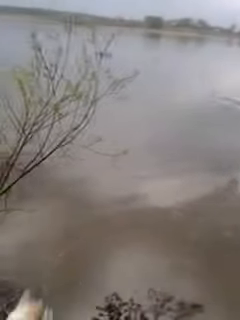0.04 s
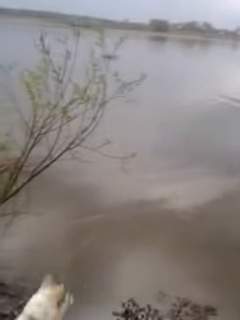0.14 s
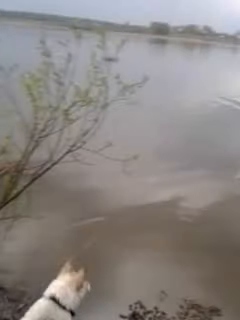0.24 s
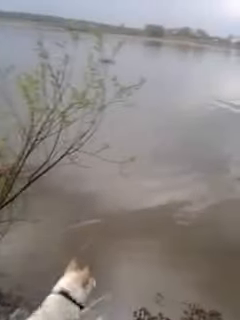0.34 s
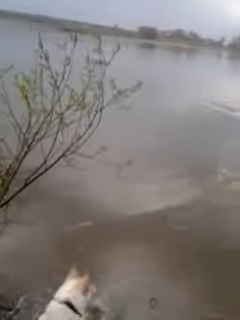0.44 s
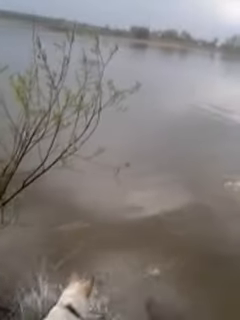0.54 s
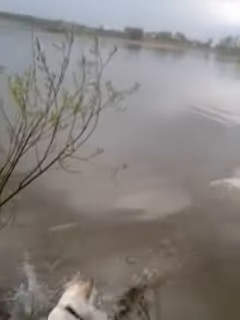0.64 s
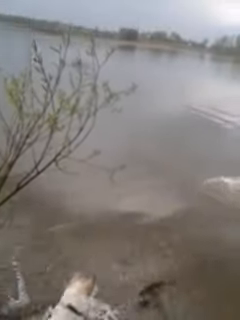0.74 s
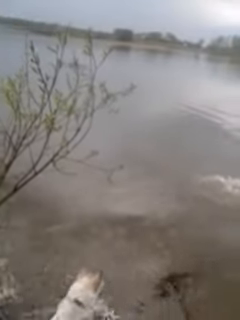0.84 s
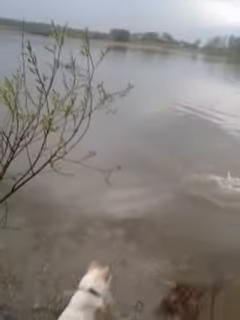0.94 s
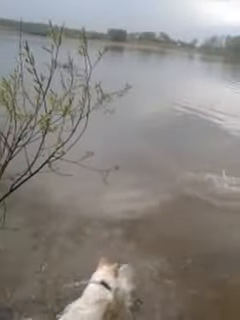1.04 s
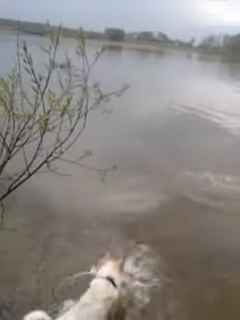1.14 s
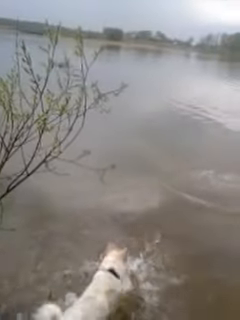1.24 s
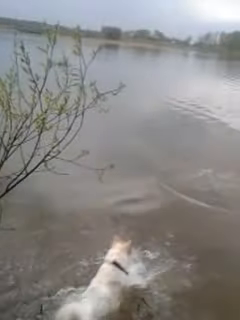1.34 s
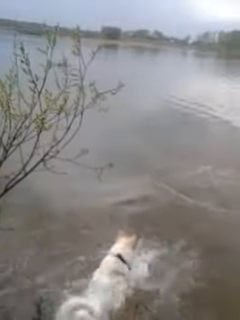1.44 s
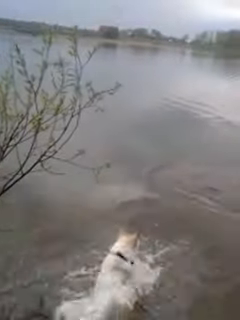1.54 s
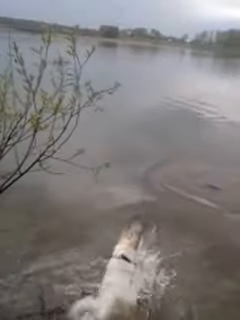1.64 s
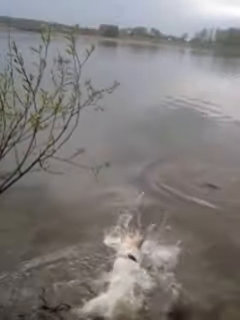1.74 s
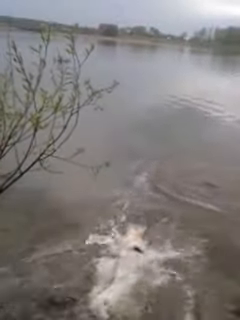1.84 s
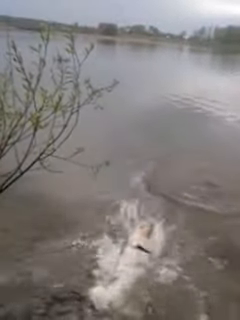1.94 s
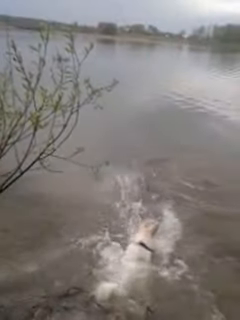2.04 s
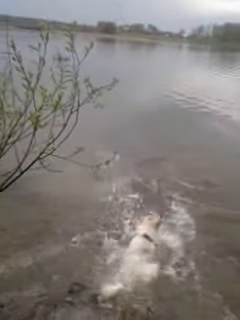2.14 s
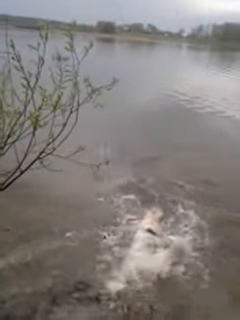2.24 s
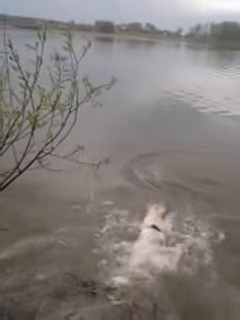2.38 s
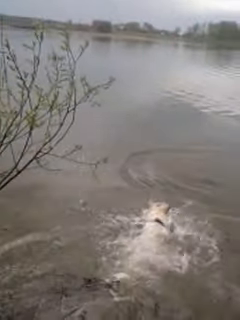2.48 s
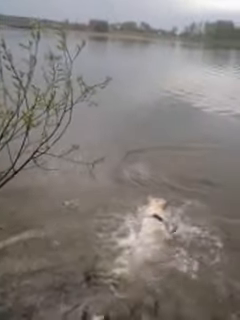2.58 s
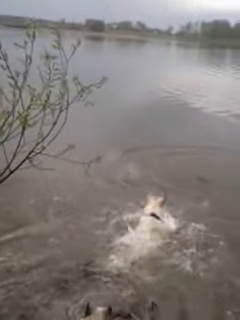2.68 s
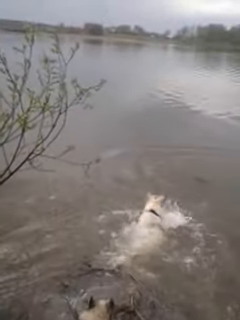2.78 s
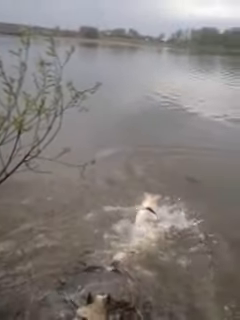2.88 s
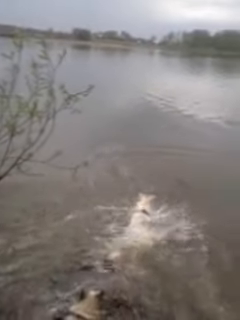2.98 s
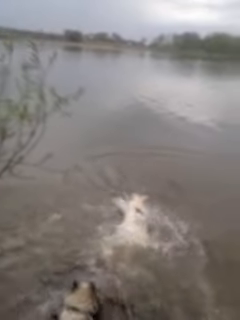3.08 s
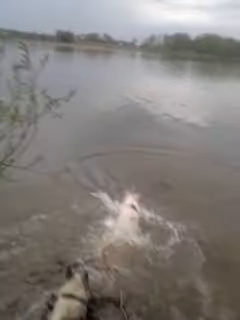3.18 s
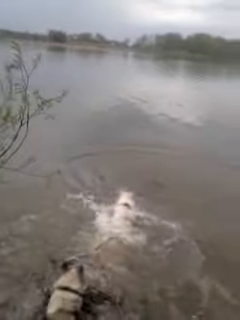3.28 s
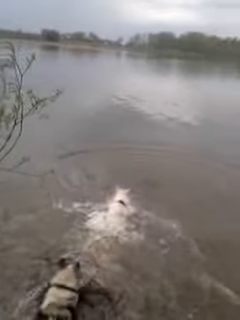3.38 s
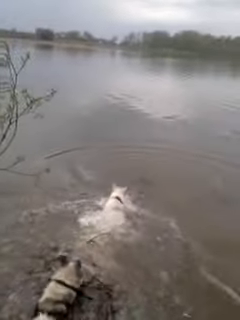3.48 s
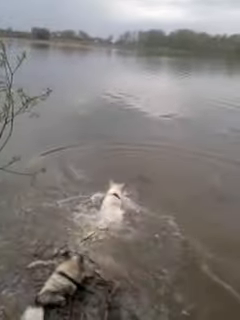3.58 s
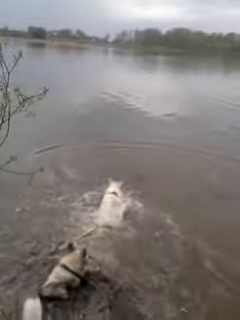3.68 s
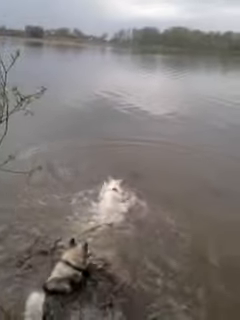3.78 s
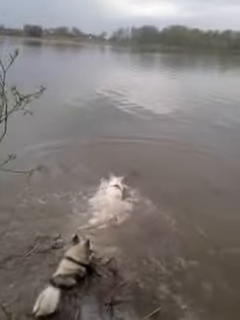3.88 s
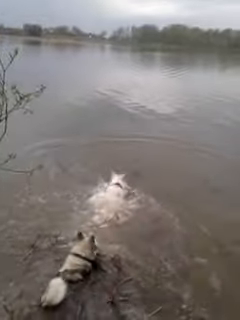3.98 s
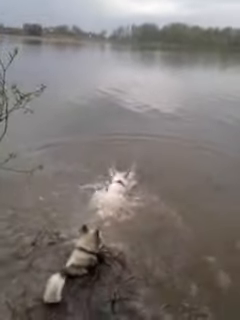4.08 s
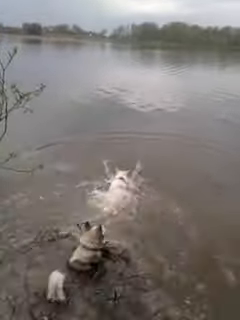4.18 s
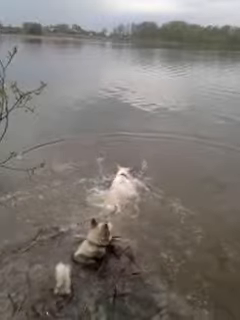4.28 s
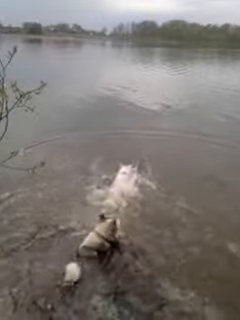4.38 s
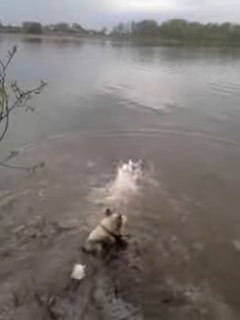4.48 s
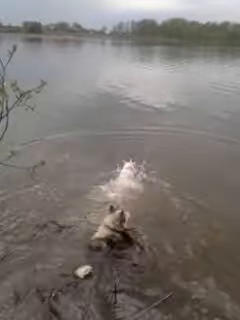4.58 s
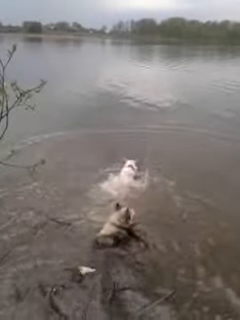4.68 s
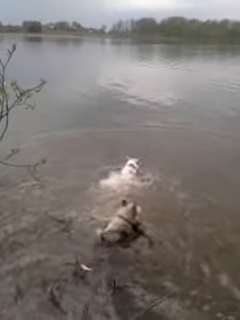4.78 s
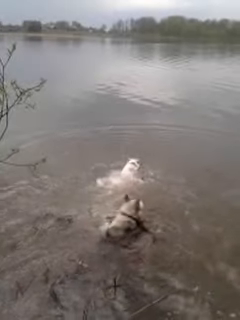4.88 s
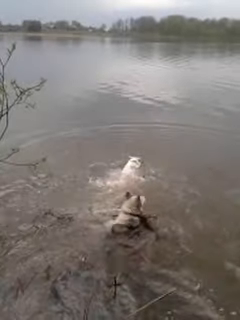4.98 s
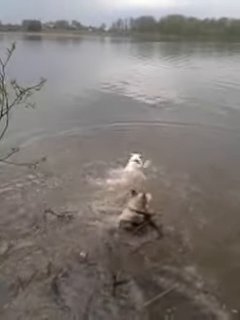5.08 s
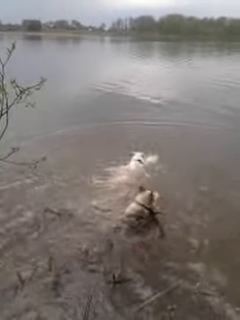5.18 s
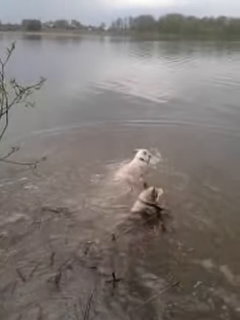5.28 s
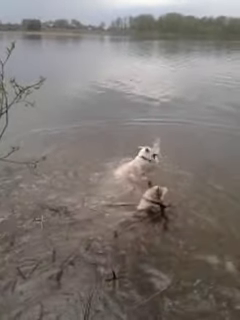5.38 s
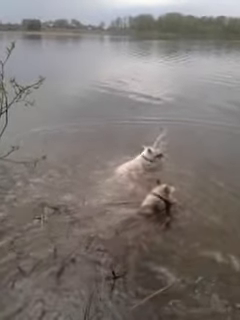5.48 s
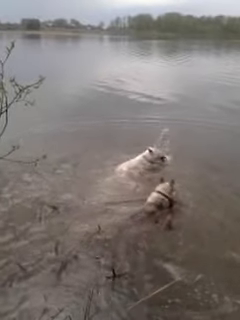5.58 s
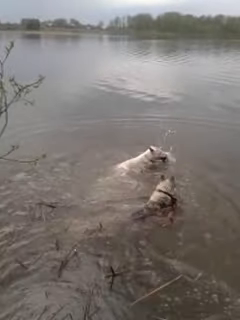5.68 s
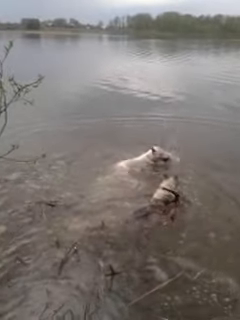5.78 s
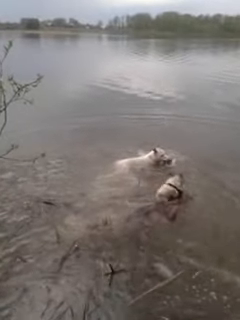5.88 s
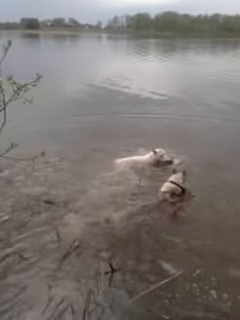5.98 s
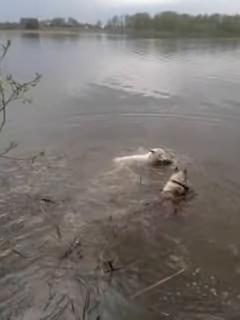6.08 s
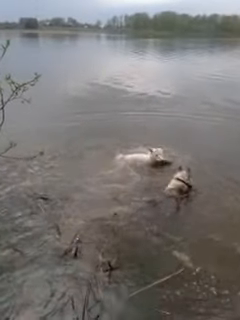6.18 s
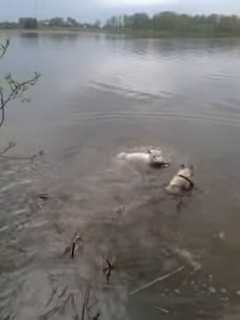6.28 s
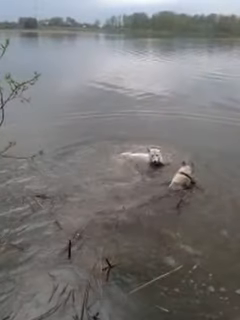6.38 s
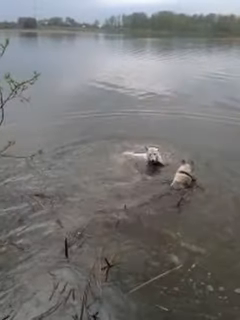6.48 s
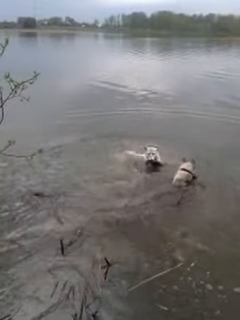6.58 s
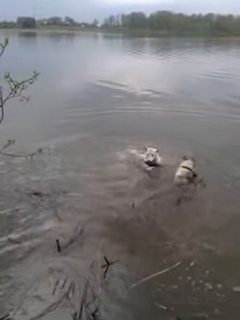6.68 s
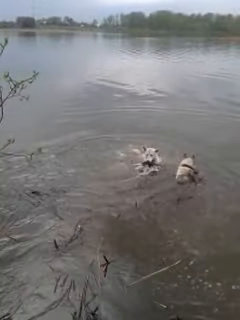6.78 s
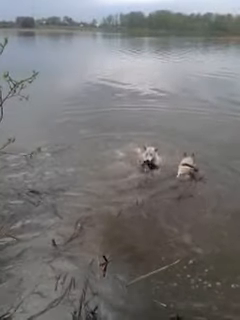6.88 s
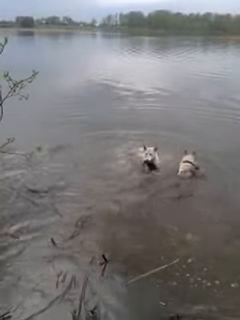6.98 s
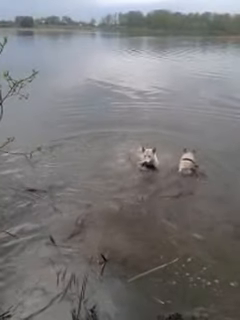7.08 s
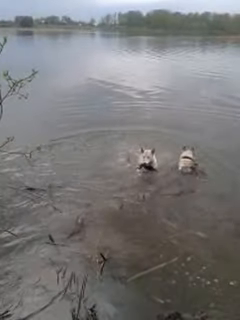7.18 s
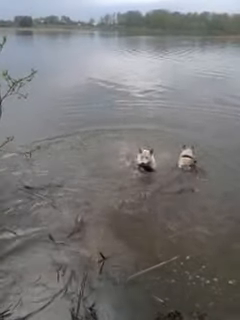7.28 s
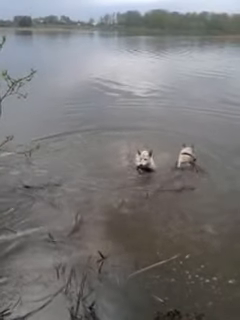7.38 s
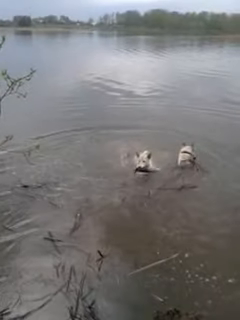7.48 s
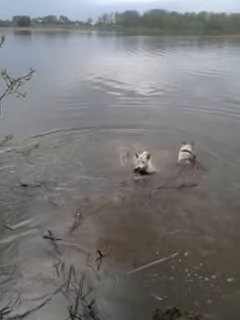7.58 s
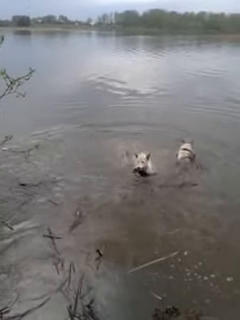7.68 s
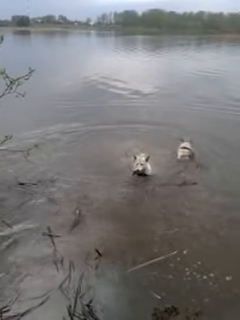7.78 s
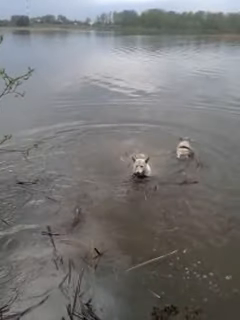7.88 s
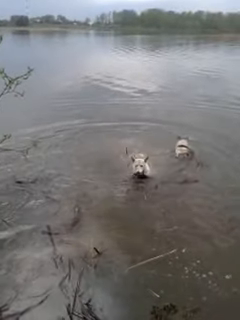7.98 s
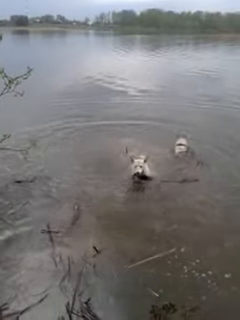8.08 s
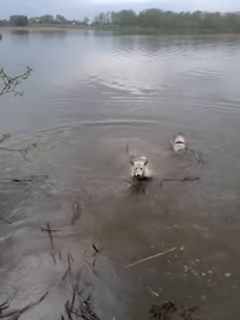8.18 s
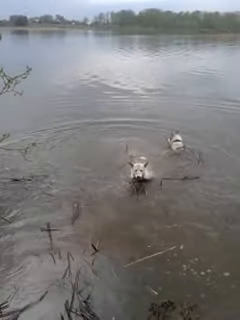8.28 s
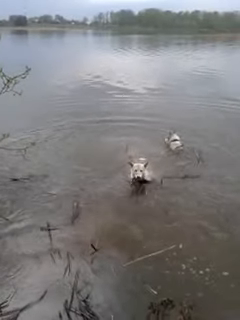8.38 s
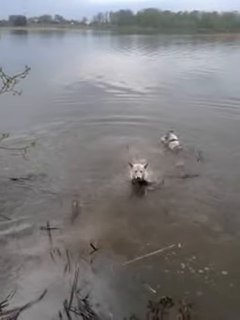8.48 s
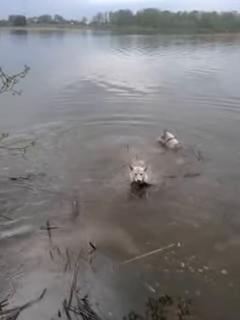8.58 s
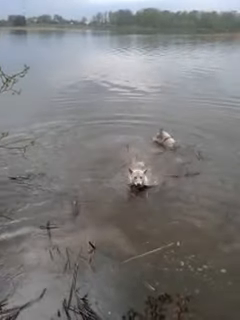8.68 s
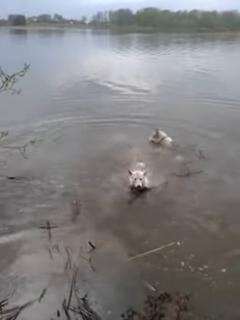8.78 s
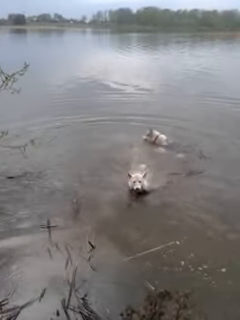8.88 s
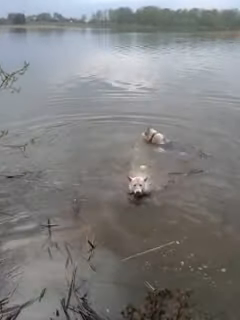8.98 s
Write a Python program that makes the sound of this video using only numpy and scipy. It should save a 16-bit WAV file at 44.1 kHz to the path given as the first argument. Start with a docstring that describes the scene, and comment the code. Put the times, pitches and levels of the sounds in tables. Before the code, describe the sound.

Heavy, crackling splashes burst out as two dogs plunge into shallow water, thinning to gentle gurgles, plops and droplets over a quiet outdoor hush.

```python
"""Paws of two dogs slap a shallow lake as they bound in and paddle away from a small mono microphone on the bank.
Slaps are short dying sines with a click and a burst of noise; air dragged under plops and gulps as rising sines.
Clouds of random ringing bubbles make the stirred water gurgle, drops patter back and fine spray fizz.
Filtered noise makes the plunges thud over a soft outdoor hush and a low rumble.
A narrow-band recorder hard-clips whatever exceeds full scale."""
import sys
import numpy as np
from scipy import signal
from scipy.fft import rfft, irfft
from scipy.io import wavfile

SR = 44100
rng = np.random.default_rng(int(sys.argv[2]) if len(sys.argv) > 2 else 0)


def unload_wav(signal):
    """Save mono or channel-first audio to the path in sys.argv[1] as 16-bit WAV at rate SR, clipped to [-1, 1]."""
    wavfile.write(
        sys.argv[1],
        SR,
        np.round(np.clip(np.atleast_2d(signal).T, -1, 1) * 32767).astype(np.int16),
    )


N = 398663

# Paws and sheets of water hitting the surface. Each row: start in seconds, ring peak in dB, pitch in Hz,
# spray burst in dB relative to that peak.
SLAPS = [(0.024, -26, 4840, -17), (.0568, -26, 2220, 2), (.1191, -22, 2100, -14), (.172, -23, 5700, -3),
         (.1885, -19.5, 2160, -3.5), (.2144, -14, 2160, -5), (.2882, -18.5, 2170, -14),
         (0.3221, -18.5, 4580, -7), (.385, -13, 2260, 2), (0.4482, -8.5, 4320, -18), (.5686, -18, 1770, -5),
         (0.5873, -10.5, 1920, -7), (0.6273, -6.5, 4080, -6), (.6963, -20, 2110, -9),
         (0.7169, -4, 4250, -1.5), (0.7616, -3.5, 5220, -13), (0.8776, -8.5, 5000, -5.5),
         (1.0934, -12.5, 4480, -1), (1.1256, -2, 2107, -12.5), (1.1745, -13, 4330, -23),
         (1.272, -8, 2110, -12), (1.3002, -12, 4420, 3.5), (1.3432, -20, 4430, 3), (1.4889, -19, 2030, 0),
         (1.6487, -17.5, 2100, -18), (1.7085, -25, 5570, -7), (1.7414, -16.5, 2210, -19),
         (1.79, -32, 2220, -9), (1.8844, -23, 5500, -16), (1.934, -14.5, 2130, -9), (2.013, -19, 5300, -13),
         (2.1021, -22, 2200, -16), (2.2209, -20, 1560, -1.5), (2.3909, -21, 2160, -9),
         (2.5952, -25, 1490, -15), (2.6334, -19, 2350, -14), (2.6997, -14, 2080, -7.5),
         (2.8095, -23, 2200, 6.5), (2.9312, -21.5, 2140, 1), (2.9886, -21.5, 2280, -5),
         (3.037, -24.5, 2110, -7), (3.3638, -19, 2050, -7), (3.5074, -22, 2070, -4.5),
         (3.6772, -24.5, 1870, -7), (3.713, -22.5, 1540, -13), (4.0292, -30, 2240, -4),
         (4.199, -29, 1960, -7), (4.2152, -28, 2220, 1), (4.4186, -33, 2140, -7), (4.6979, -25, 1320, -9),
         (4.8968, -27.5, 1980, -6), (5.3782, -29, 1750, -8), (5.3952, -26, 2270, -19),
         (5.4136, -24.5, 1910, -29), (5.565, -17, 1820, -22), (5.5887, -27, 1970, -14),
         (5.7911, -27, 1730, -28), (5.8122, -22, 1770, -20), (6.0933, -22, 2110, -31),
         (6.161, -14, 1670, -33), (6.183, -20, 2030, -25), (6.348, -26, 5870, -6),
         (6.5784, -28.5, 1770, -34), (7.1037, -16.5, 1720, -34), (7.539, -33, 2070, -18),
         (8.4331, -28.5, 2060, -20), (8.4492, -27.5, 1540, -21), (8.5101, -26, 2050, -21),
         (8.5382, -25, 1680, -26), (8.5854, -31, 2060, -25), (8.9655, -38.5, 1910, -7)]
# A leg or chest plunging in. Each row: start in seconds, gulp peak in dB, pitch in Hz, ring t60 in seconds,
# thud in dB, wash of drops falling back in dB.
PLUNGES = [(0.188, -38, 374, 0.069, -60, -27.5), (0.312, -30, 238, 0.084, -62, -30),
           (0.371, -21, 352, 0.094, -62, -26), (.576, -24, 304, 0.047, -54, -27),
           (0.698, -40, 270, 0.1, -57, -32), (0.787, -32, 339, 0.17, -48, -35),
           (0.879, -38, 328, 0.14, -48.5, -28), (1.1, -48, 302, 0.075, -54, -25.5),
           (1.156, -31.5, 308, 0.088, -64, -44), (1.266, -25, 327, 0.077, -59, -27.5),
           (1.48, -20.5, 338, 0.059, -47.5, -25.5), (1.736, -42, 296, 0.26, -59, -32),
           (1.793, -31, 328, 0.12, -40.5, -48), (2.02, -38, 340, .12, -51, -49),
           (2.113, -27, 310, 0.087, -42, -35), (2.252, -49, 300, 0.075, -56, -43),
           (2.519, -24.5, 370, 0.059, -46, -41), (2.721, -29.5, 376, 0.066, -55, -36),
           (2.874, -24.5, 323, 0.073, -47, -32), (3.069, -38.5, 294, 0.33, -62, -45),
           (3.221, -22.5, 345, 0.042, -47, -28.5), (3.543, -28, 340, 0.049, -48, -47),
           (3.773, -36.5, 340, .17, -58, -36.5), (3.873, -34, 413, 0.066, -56, -41),
           (4.09, -32.5, 253, 0.14, -66, -34), (4.203, -37, 397, 0.093, -53, -34),
           (4.461, -44, 212, 0.12, -66, -56), (4.544, -40.5, 400, 0.087, -58, -33.5),
           (4.794, -42, 247, 0.12, -62, -46), (4.883, -42, 406, 0.14, -52, -46.5),
           (5.053, -36, 352, 0.13, -64, -56), (5.379, -39, 240, 0.14, -61, -36.5),
           (5.561, -32.5, 427, 0.094, -56, -44), (5.804, -55, 350, 0.069, -61, -38),
           (6.141, -45, 350, 0.12, -58, -33), (6.34, -54, 350, 0.11, -54, -47),
           (7.014, -42, 297, 0.091, -61, -43), (7.329, -37, 384, .11, -62, -51),
           (7.733, -38, 296, 0.062, -55, -35.5), (8.497, -40, 407, 0.1, -60, -36.5)]
# Spectrum of big bubbles. Each row: frequency in Hz, relative density in dB per Hz.
GURGLE_SPECTRUM = [(65, -70), (110, -41.5), (231, -11), (327, -5), (445, -2.5), (623, 5.5), (785, 2),
                   (1100, -5), (1430, -30), (2420, -120)]
# Spectrum of fine spray. Each row: frequency in Hz, relative density in dB per Hz.
SPRAY_SPECTRUM = [(1620, -30), (2750, -20), (2860, -11.5), (3180, -4.5), (3550, -0.5), (4330, 0),
                  (5140, -2), (5510, -0.5), (5820, -5), (6920, 3.5), (7200, 4.5), (7710, -3.5),
                  (10000, -66), (17000, -120)]
# Colour of the water sound over time. Each row: time in seconds, share of the near colour from 0 to 1.
NEARNESS = [(0, 0.77), (3.3, 0.61), (4.2, 0.36), (9.04, 0.08)]
MOMENT = np.arange(SR // 2) / SR   # clock of one event in seconds; no event outlasts half a second


def from_db(db):
    """Level law: decibels to amplitude gain."""
    return 10 ** (np.asarray(db) / 20)


def rms_one(x):
    """Power normalization: scale to rms 1."""
    return x / np.sqrt(np.mean(x ** 2) + 1e-20)


def in_time(rows):
    """Linear interpolation: each column of a curve table becomes one value a sample."""
    s, *columns = np.transpose(rows)
    return [np.interp(np.arange(N) / SR, s, column) for column in columns]


def drift(rate):
    """Low-passed randomness: noise through two equal one-pole filters with corner rate in Hz, rms 1."""
    pole = np.exp(-2 * np.pi * rate / SR)
    noise = rng.standard_normal(N + SR)
    smooth = signal.lfilter([1], [1, -2 * pole, pole * pole], noise)
    return rms_one(smooth[SR:])   # the first second lets the filter settle


def colour(x, spectrum):
    """Minimum-phase filtering: a folded cepstrum gives a flat sound the spectrum causally; rms 1."""
    size = 2 ** 14
    hz, db = np.transpose(spectrum)
    log_bins = np.log(np.fft.rfftfreq(size, 1 / SR) + 1)
    log_gain = np.log(from_db(np.interp(log_bins, np.log(hz), np.maximum(db, -70))))
    cepstrum = irfft(log_gain)
    # fold negative time onto positive time
    cepstrum[1:size // 2] *= 2
    cepstrum[size // 2 + 1:] = 0
    impulse_response = irfft(np.exp(rfft(cepstrum)))
    return rms_one(signal.fftconvolve(x, impulse_response)[:N])


def noise(spectrum):
    """Spectral shaping: white noise coloured to a spectrum, rms 1."""
    return colour(rng.standard_normal(N), spectrum)


def fade(peak_db, t60, attack):
    """Exponential decay after a smooth swell whose time constant is a share (attack) of t60."""
    t = MOMENT[:round(2 * t60 * SR)]
    shape = (1 - np.exp(-t / (attack * t60))) ** 2 * from_db(-60 * t / t60)
    return from_db(peak_db) * shape / shape.max()


def add(track, s, sound):
    """Superposition: mix a short sound into a track at a time in seconds."""
    start = round(s * SR)
    track[start:start + len(sound)] += sound[:N - start]


def flares(events, attack):
    """Superposed decay envelopes of bursts given as (s, peak dB, t60 s)."""
    out = np.zeros(N)
    for s, peak_db, t60 in events:
        add(out, s, fade(peak_db, t60, attack))
    return out


def bubbles(low_hz, high_hz, per_s, cycles, uneven_db, clump_db, clump_rate, patchy_db, count=20):
    """Resonator bank: random clicks ring bubbles that lose 60 dB in a set number of cycles, in clumps."""
    strengths = from_db(uneven_db * np.minimum(rng.exponential(1, N), 4)) * rng.choice([-1, 1], N)
    born = rng.random(N) < per_s / SR
    dealt = rng.integers(0, count, N)   # which resonator each click rings
    # groups of five neighbouring sizes swell and thin on their own
    patches = [from_db(patchy_db * drift(clump_rate / 2)) for _ in range(count // 5)]
    out = 0
    for k, hz in enumerate(np.geomspace(low_hz, high_hz, count)):
        radius = from_db(-60 * hz / (cycles * SR))
        angle = 2 * np.pi * hz / SR
        clicks = strengths * born * (dealt == k) * patches[k // 5]
        poles = [1, -2 * radius * np.cos(angle), radius * radius]
        ringing = signal.lfilter([0, np.sin(angle)], poles, clicks + 1e-18)
        out = out + hz * ringing   # weight by pitch to level the spectrum
    return out * from_db(clump_db * drift(clump_rate))


def lone_bubbles(events, attack, rough, rough_rate, lead=.12):
    """Bubble resonance: a dying sine climbs near the surface, passing its pitch a share (lead) into its ring."""
    out = np.zeros(N)
    # turbulence shakes loudness and pitch
    shake, sway = drift(rough_rate), drift(rough_rate)
    for s, peak_db, hz, ring_s, octaves in events:
        shape = fade(peak_db, ring_s, attack)
        now = (round(s * SR) + np.arange(len(shape))) % N
        climb = octaves * (np.minimum(MOMENT[:len(shape)] / ring_s, 1) - lead)
        pitch = hz * 2 ** (climb + 0.18 * rough * sway[now])
        sine = np.sin(2 * np.pi * np.cumsum(pitch) / SR)
        add(out, s, shape * (1 + rough * shake[now]) * sine)
    return out


def pockets(events, octaves, attack, burst_attack, rough, rough_rate, lead=0):
    """Resonance with turbulence: one bubble an event, and the envelope of the burst of foam it throws up."""
    bursts = flares([(row[0] - lead, row[1] + row[4], row[5]) for row in events], burst_attack)
    ringing = lone_bubbles([(*row[:4], octaves) for row in events], attack, rough, rough_rate)
    return ringing, bursts


def companions(events, under_db, spread_octaves, late_s, count=3):
    """Bubble fragmentation: a big pocket breaks up, so fainter bubbles of other sizes follow each event."""
    chance = rng.random((len(events), count, 3))
    fragments = []
    for (s, peak_db, hz, ring_s, octaves), draws in zip(events, chance):
        for when, loud, size in draws:
            fragment_db = peak_db + under_db * (.5 + loud)
            fragment_hz = hz * 2 ** (spread_octaves * (size - .4))
            fragments.append((s + late_s * when, fragment_db, fragment_hz, ring_s * 0.83, octaves))
    return fragments


def patter(x):
    """Crossfaded spectra: the colour of drops falling back flattens as the dogs move off."""
    # Spectra near and far. Each row: frequency in Hz, relative density in dB per Hz.
    near_spectrum = [(530, -26.5), (900, 1), (1080, -4), (1860, -15.5), (2070, 0.5), (2180, 5), (2800, -20),
                     (3640, -58.5), (6160, -120)]
    far_spectrum = [(530, -41), (900, -7.5), (1240, 0.5), (1430, -2), (1680, -1.5), (2180, 0.5),
                    (2800, -35), (3640, -65.5), (6160, -120)]
    near = in_time(NEARNESS)[0]
    return near * colour(x, near_spectrum) + (1 - near) * colour(x, far_spectrum)


def plunge_envelope(column, t60, attack, lead=0):
    """Impulsive excitation: an envelope swells at every plunge to the level in one column of its row."""
    return flares([(row[0] - lead, row[column], t60) for row in PLUNGES], attack)


def hush():
    """Stationary noise: a steady soft outdoor hush."""
    # Spectrum of the hush. Each row: frequency in Hz, relative density in dB per Hz.
    hush_spectrum = [(19, -36.5), (32, -5), (71, -19), (113, -33), (183, -7.5), (390, -5), (551, 0.5),
                     (1260, 0), (1620, -10.5), (2080, -6.5), (2680, -16.5), (4150, -18), (6130, -28.5),
                     (7030, -27), (7710, -48), (10000, -81), (17000, -120)]
    return from_db(-46.5) * noise(hush_spectrum)


def rumble():
    """Stationary low-frequency noise: a steady rumble."""
    # Spectrum of the rumble. Each row: frequency in Hz, relative density in dB per Hz.
    rumble_spectrum = [(8.8, -25.5), (15, -0.5), (27, -18), (48, 2), (69, 1), (78, -6), (108, -35.5),
                       (140, -9), (180, -33), (310, -120)]
    return from_db(-63.5) * noise(rumble_spectrum)


def thuds():
    """Transient low-frequency noise: each plunge thuds and dies away."""
    # Spectrum of the thuds. Each row: frequency in Hz, relative density in dB per Hz.
    thud_spectrum = [(8.8, -26), (15, -3.5), (38, 4), (53, 5), (68, -5), (78, -22), (92, -35), (110, -32.5),
                     (140, -58.5), (240, -120)]
    return plunge_envelope(column=4, t60=0.37, attack=0.017) * noise(thud_spectrum)


def churn():
    """Bubble-cloud acoustics: three sizes follow the stirring, with falling drops and thrown sheets of spray."""
    # Stirred water between the plunges. Each row: time in seconds, gurgle, patter and spray levels in dB.
    stirring = [(0.0, -44.5, -39.5, -34.5), (0.2, -41, -35.5, -37.5), (0.38, -34.5, -37, -39),
                (0.73, -36.5, -25, -24.5), (0.93, -36.5, -30, -31), (1.66, -37, -31, -30.5),
                (2.49, -40, -34, -35), (2.79, -35, -31, -29.5), (3.04, -36.5, -35, -38.5),
                (3.47, -37.5, -30.5, -34.5), (4.18, -47.5, -41, -47), (4.91, -38.5, -36.5, -41),
                (5.24, -47, -39, -47.5), (6.12, -46, -42.5, -48.5), (6.65, -50.5, -48, -56),
                (7.3, -47.5, -39, -50.5), (7.53, -45, -44, -54.5), (8.43, -47, -47, -59.5),
                (8.61, -45.5, -43.5, -56), (9.04, -47, -48.5, -57.5)]
    # Sheets of spray fizzing as they fall. Each row: start in seconds, peak in dB, t60 in seconds.
    spray_sheets = [(.172, -22.5, 0.62), (.32, -25.5, 0.99), (.56, -30, .6), (.68, -35, 0.86),
                    (.78, -24, .5), (.89, -31, 1), (1.088, -20.5, 0.51), (1.25, -22.5, 0.41),
                    (1.48, -29.5, 0.58), (1.68, -31.5, .6), (1.97, -35.5, 1), (2.2, -32, 0.27),
                    (2.5, -36.5, 0.71), (2.69, -30.5, .7), (2.85, -35, .6), (2.95, -32, 0.16),
                    (3.23, -34, 1), (3.45, -39, 0.33), (3.67, -39.5, 0.55), (3.77, -38.5, 0.42),
                    (3.88, -44, 0.35), (4.03, -41.5, 1), (4.195, -34.5, 0.33), (4.4, -46, .4),
                    (4.55, -43, 0.49), (4.69, -44, 0.31), (4.82, -44.5, 1), (4.94, -44, 0.38),
                    (5.17, -49, 0.21), (5.36, -43.5, 1), (5.55, -40.5, .4), (5.8, -43.5, 0.43),
                    (6.03, -44, 0.47), (6.14, -43.5, .4), (6.2, -42.5, .5), (6.3, -47, 0.36),
                    (6.35, -49, 0.38), (6.41, -55, 0.23), (6.6, -51.5, 0.75), (6.88, -48.5, 0.75),
                    (7.02, -45.5, 0.53), (7.1, -46.5, 0.67), (7.27, -50, 1), (7.37, -44.5, 0.31),
                    (7.46, -53, 0.3), (7.64, -51.5, .5), (7.72, -48.5, 0.79), (7.8, -46.5, 0.23),
                    (7.95, -67, 0.26), (8.04, -48, 0.73), (8.11, -65, 0.45), (8.43, -48, 0.7),
                    (8.52, -55, .7), (8.72, -55, .7), (8.96, -59, 0.33)]
    gurgle_db, patter_db, spray_db = in_time(stirring)
    wash = plunge_envelope(column=5, t60=0.4, attack=0.04, lead=0.013)
    sheets = flares(spray_sheets, attack=0.015)
    big = bubbles(135.8, 1260, per_s=900, cycles=17.7, uneven_db=0.0,
                  clump_db=2.5, clump_rate=11.6, patchy_db=3.15)
    middle = bubbles(811, 3266, per_s=2400, cycles=18.6, uneven_db=0.0,
                     clump_db=2.15, clump_rate=12, patchy_db=1.5, count=30)
    fine = bubbles(2477, 8000, per_s=5000, cycles=80.0, uneven_db=-0.5,
                   clump_db=1.18, clump_rate=21.3, patchy_db=1.37, count=40)
    # independent sounds add in power, hence hypot
    gurgling = from_db(gurgle_db) * colour(big, GURGLE_SPECTRUM)
    pattering = np.hypot(from_db(patter_db), wash) * patter(middle)
    fizzing = np.hypot(from_db(spray_db), sheets) * colour(fine, SPRAY_SPECTRUM)
    return gurgling + pattering + fizzing


def trickle():
    """Sustained bubble resonance: a trickle holds its note."""
    # Notes of the trickle. Each row: start in seconds, peak in dB, pitch in Hz, ring t60 in seconds,
    # climb in octaves.
    trickle_notes = [(7.625, -38, 1810, 0.063, 0.32), (7.662, -32.5, 2070, 0.19, 0.026)]
    return lone_bubbles(trickle_notes, attack=0.047, rough=.3, rough_rate=190)


def droplets():
    """Small-bubble resonance: droplets standing out of the spray ring high; also their noise-tick envelope."""
    # Single droplets. Each row: start in seconds, peak in dB, pitch in Hz.
    single_drops = [(3.0435, -35, 5130), (3.142, -28, 4090), (3.1777, -31, 5400), (3.29, -40, 4850),
                    (3.6546, -34, 4140), (3.7843, -31, 5800), (4.0322, -36, 5560), (4.6633, -38, 3960),
                    (4.6983, -30, 3680), (4.838, -32.5, 3840), (4.9955, -36, 3670), (5.146, -32.5, 3800),
                    (5.233, -38, 3700), (5.459, -36, 3440), (5.51, -38, 3550), (5.8138, -29, 3800),
                    (6.048, -41, 5590), (6.094, -31, 4500), (6.218, -38, 4700), (6.6782, -42, 4280),
                    (7.1112, -38, 4030), (7.1591, -32.5, 3020), (7.653, -42, 4130), (7.8076, -35.5, 4030),
                    (7.9508, -40, 4070)]
    ring_s, climb_octaves = 0.018, 0.14
    rows = [(*row, ring_s, climb_octaves) for row in single_drops]
    ringing = lone_bubbles(rows, attack=.04, rough=0.36, rough_rate=1200)
    ticks = flares([(s, peak_db - 23, .012) for s, peak_db, _ in single_drops], attack=0.039)
    return ringing, ticks


def gulps():
    """Large-cavity resonance: plunges close deep pockets of air, which rise in pitch and break up."""
    climb_octaves_per_s = 13
    deep = [(*row[:4], climb_octaves_per_s * row[3]) for row in PLUNGES]
    broken_up = companions(deep, under_db=-10.5, spread_octaves=1.4, late_s=.04)
    return lone_bubbles(deep + broken_up, attack=0.026, rough=0.34, rough_rate=63)


def plops():
    """Bubble resonance: closing air pockets ring; also the envelope of foam building just before each closes."""
    # Air pockets closing. Each row: start in seconds, peak in dB, pitch in Hz, ring t60 in seconds,
    # gurgle burst in dB relative to the peak.
    air_pockets = [(.171, -23, 890, 0.017, -9.5), (.188, -28.5, 610, 0.059, -26),
                   (.321, -19, 680, 0.059, -7), (.384, -15, 970, 0.021, -22), (.484, -12, 790, 0.024, -43),
                   (.556, -25, 670, 0.067, -20), (.581, -26, 1030, 0.062, -9), (.625, -20, 670, 0.024, -30),
                   (.695, -19, 700, 0.047, -17.5), (.735, -23, 674, .061, -19), (.774, -17, 755, 0.11, -12),
                   (.836, -23, 726, 0.05, -28), (1.019, -26, 887, 0.063, -19), (1.126, -31, 1140, 0.2, -12),
                   (1.158, -27.5, 787, 0.21, -1), (1.193, -25, 785, .05, -32),
                   (1.252, -28.5, 790, .081, -4), (1.268, -19.5, 1090, 0.069, -12.5),
                   (1.492, -15, 744, 0.035, -8.5), (1.563, -24, 750, 0.047, -28),
                   (1.734, -14.5, 800, 0.022, -13), (1.778, -27, 750, 0.056, -5.5),
                   (1.794, -15, 860, 0.047, -14), (1.935, -12, 770, 0.035, -25),
                   (2.034, -32, 557, 0.098, -12), (2.102, -20, 760, 0.055, -13),
                   (2.118, -22, 633, 0.065, -14), (2.206, -24, 781, .04, -19),
                   (2.387, -31, 614, 0.049, -23), (2.494, -29, 840, 0.036, -4.5),
                   (2.513, -18, 727, 0.035, -11.5), (2.702, -10, 611, 0.057, -19.5),
                   (2.876, -17, 625, 0.044, -9.5), (2.913, -20.5, 700, 0.072, -21),
                   (3.041, -38, 600, 0.046, -5), (3.155, -23.5, 627, 0.024, -31),
                   (3.215, -16, 706, .021, -16), (3.362, -23.5, 655, 0.033, -12),
                   (3.518, -27, 612, 0.2, -12), (3.534, -16.5, 588, 0.044, -22),
                   (3.88, -29.5, 500, 0.05, -3.5), (3.893, -27, 489, 0.17, -8.5),
                   (4.032, -28.5, 646, .021, -28), (4.083, -31, 537, 0.034, -3),
                   (4.21, -19.5, 620, 0.05, -7.5), (4.547, -32.5, 580, 0.029, -4),
                   (4.847, -20, 593, .05, -23), (4.924, -36, 627, .05, -20), (5.081, -29, 610, 0.069, -26),
                   (5.151, -29.5, 605, 0.088, -20), (5.274, -32.5, 560, 0.054, -14),
                   (5.365, -19.5, 556, 0.031, -16), (5.509, -35.5, 519, 0.12, -3.5),
                   (5.549, -34, 1200, .03, -8), (5.561, -18.5, 1317, 0.036, -16.5),
                   (5.589, -28, 584, 0.067, -30), (5.797, -28, 800, 0.027, -6),
                   (6.125, -32, 578, 0.079, -4.5), (6.158, -31, 1150, 0.035, -14),
                   (6.596, -30, 1020, 0.042, -20), (6.879, -33.5, 593, 0.066, -13.5),
                   (6.94, -28.5, 1160, 0.025, -19), (7.092, -36, 1130, .066, -10),
                   (7.145, -33.5, 863, 0.063, -27), (7.335, -26, 557, 0.066, -10.5),
                   (7.376, -26, 507, 0.059, -14), (7.618, -29.5, 870, 0.04, -10.5),
                   (7.735, -33.5, 566, 0.075, -7), (7.759, -29.5, 568, .11, -9),
                   (8.089, -34, 485, .05, -20), (8.492, -26.5, 530, 0.02, -7),
                   (8.535, -25.5, 910, 0.025, -28), (8.837, -28.5, 580, 0.019, -17)]
    burst_t60_s = 0.17
    return pockets([(*row, burst_t60_s) for row in air_pockets], octaves=0.4, attack=0.021,
                   burst_attack=0.051, rough=0.28, rough_rate=120, lead=.008)


def cracks():
    """Impulse response: contact gives one sharp spray-coloured click, which distance dulls."""
    contact_db = -1   # click peak relative to the slap's ring, where nearness is one half
    far_db = -27   # change in level from nearness 1 to nearness 0
    impulse = np.zeros(N)
    impulse[0] = 1
    click = colour(impulse, SPRAY_SPECTRUM)[:SR // 20]
    click = click / np.abs(click).max()
    out = np.zeros(N)
    for row, sign in zip(SLAPS, rng.choice([-1, 1], len(SLAPS))):
        add(out, row[0], sign * from_db(row[1] + contact_db) * click)
    return out * from_db(far_db * (0.5 - in_time(NEARNESS)[0]))


def slaps():
    """Impact resonance: slaps ring for a set number of cycles; also their spray and spatter envelopes."""
    ring_cycles, spray_t60_s = 29.3, 0.027
    spatter_db, spatter_lead_s = -14, 0.0044   # relative to the ring peak; the first drops land just ahead
    rows = [(s, peak_db, hz, ring_cycles / hz, spray_db, spray_t60_s) for s, peak_db, hz, spray_db in SLAPS]
    ringing, spray_bursts = pockets(rows, octaves=0.077, attack=0.016, burst_attack=0.0066,
                                    rough=0.17, rough_rate=850)
    spatter = flares([(row[0] - spatter_lead_s, row[1] + spatter_db, .045) for row in SLAPS], attack=0.081)
    return ringing, spray_bursts, spatter


def foam(plop_bursts, spray_bursts, spatter):
    """Modulated noise: foam of three colours flares with the single splashes, its loudness shaken at random."""
    gurgle_foam, patter_foam, spray_foam = rng.standard_normal((3, N)) * from_db(4.3 * drift(73))
    bursts = colour(gurgle_foam, GURGLE_SPECTRUM) * plop_bursts
    bursts += patter(patter_foam) * (from_db(-6) * plop_bursts + spatter)
    bursts += colour(spray_foam, SPRAY_SPECTRUM) * spray_bursts
    return bursts


def splashes():
    """Superposition and filtering: single splashes and foam, with weak bass and the microphone's dip."""
    low_hz = 141.7   # open water radiates little below this
    dip_hz, dip_width_hz, dip_depth = 2780, 260, 0.5   # depth as a share of amplitude removed
    drop_rings, ticks = droplets()
    plop_rings, plop_bursts = plops()
    slap_rings, spray_bursts, spatter = slaps()
    thrown = plop_rings + slap_rings + gulps() + drop_rings + trickle() + cracks()
    thrown += foam(plop_bursts, spray_bursts + ticks, spatter)
    thrown = signal.sosfilt(signal.butter(4, low_hz, "high", fs=SR, output="sos"), thrown)
    peak_filter = signal.iirpeak(dip_hz, dip_hz / dip_width_hz, fs=SR)
    return thrown - dip_depth * signal.lfilter(*peak_filter, thrown)


def scene():
    """Linear superposition: background, stirred water and splashes, the same in both channels."""
    mono = hush() + rumble() + thuds() + churn() + splashes()
    return np.tile(mono, (2, 1))


def record(dry):
    """Nonlinear distortion: treble cut, then hard clipping at full scale, whose crackle reaches higher."""
    # edges in Hz at which each filter reaches its full stopband loss
    band_edge_hz, cutoff_hz = 8000, 15800
    narrow = signal.sosfilt(signal.cheby2(10, 60, band_edge_hz, fs=SR, output="sos"), dry)
    clipped = np.clip(narrow, -1, 1)
    return signal.sosfilt(signal.cheby2(12, 70, cutoff_hz, fs=SR, output="sos"), clipped)


dry = scene()
out = record(dry)
unload_wav(out)
```